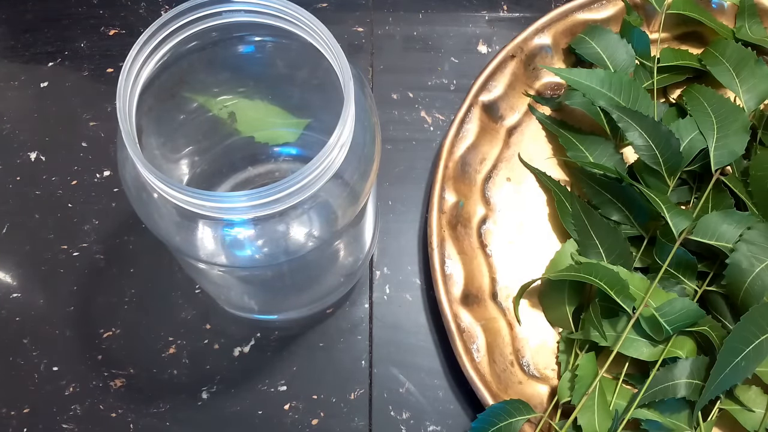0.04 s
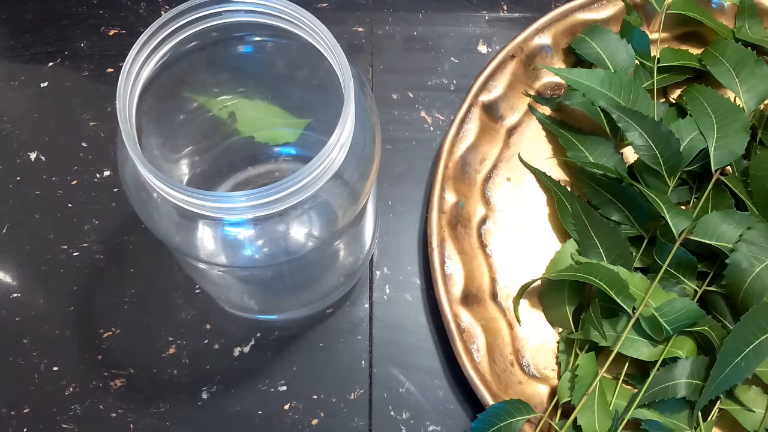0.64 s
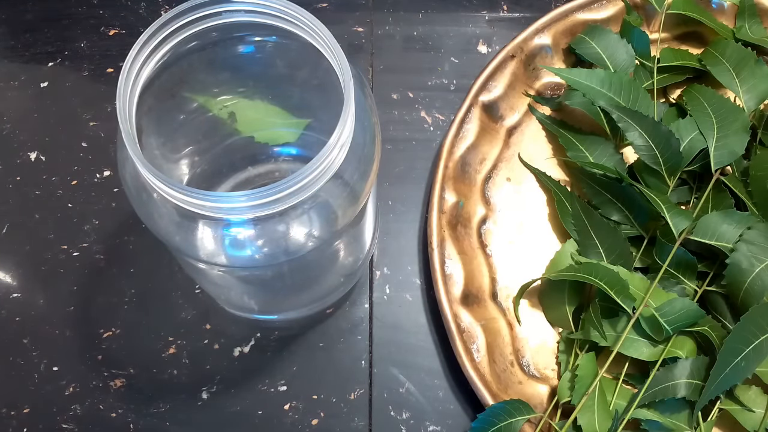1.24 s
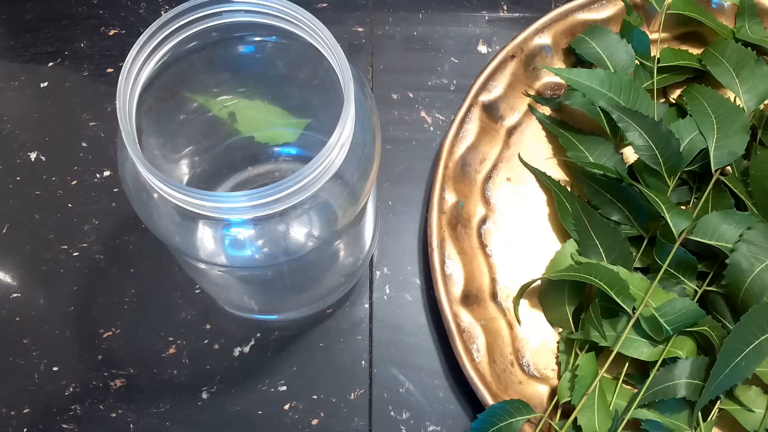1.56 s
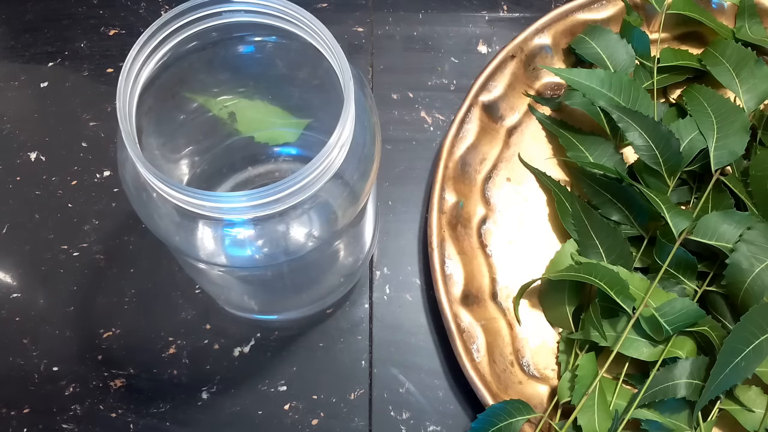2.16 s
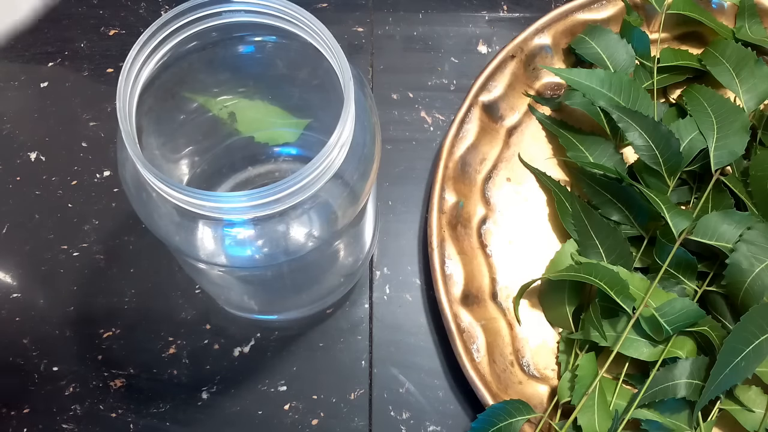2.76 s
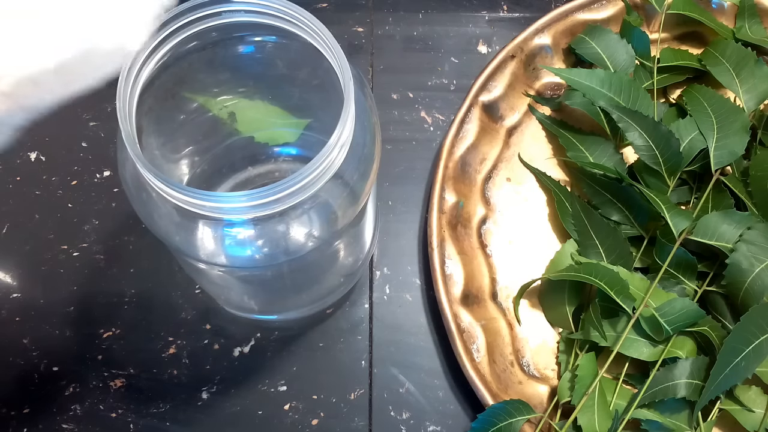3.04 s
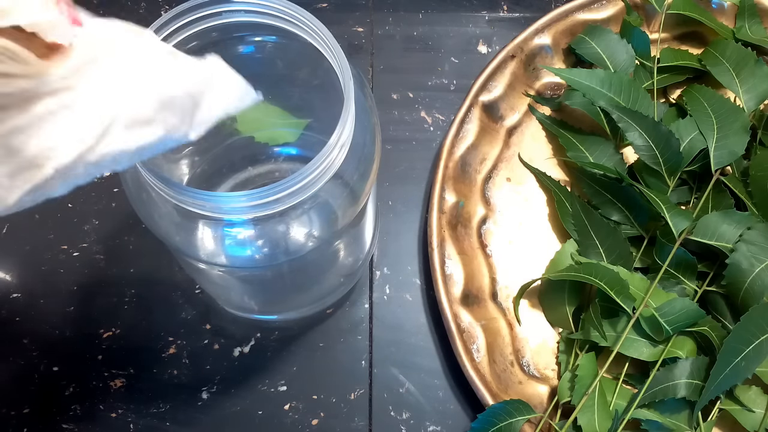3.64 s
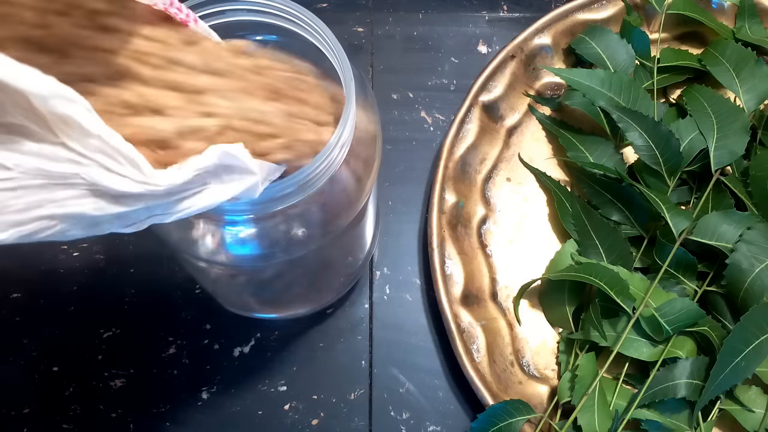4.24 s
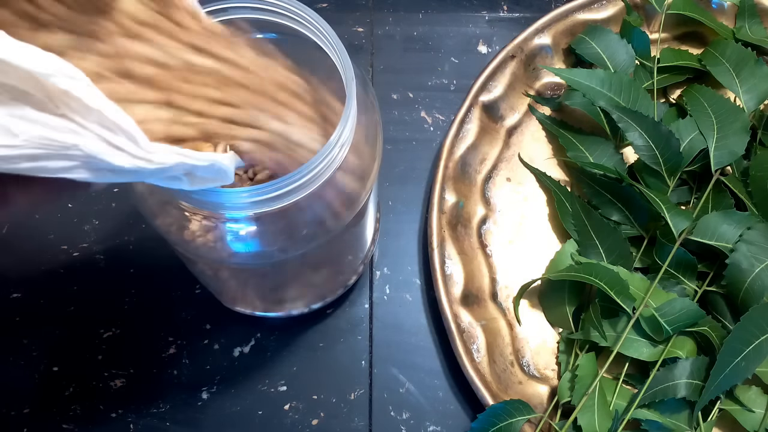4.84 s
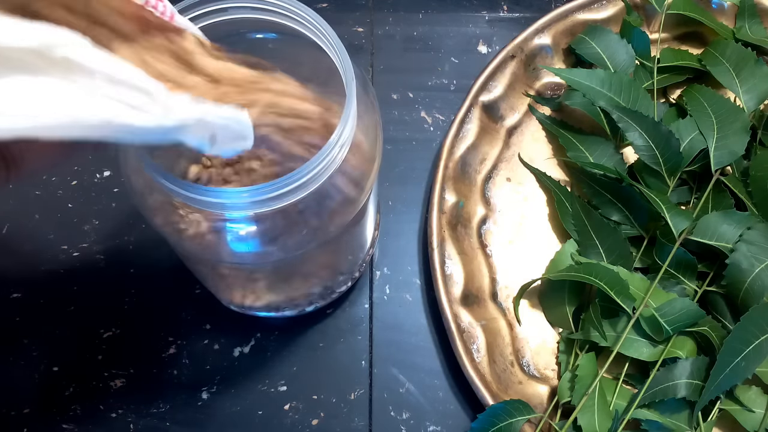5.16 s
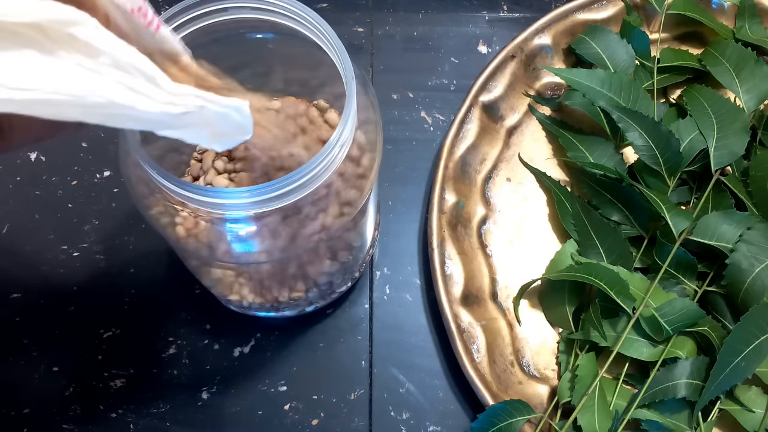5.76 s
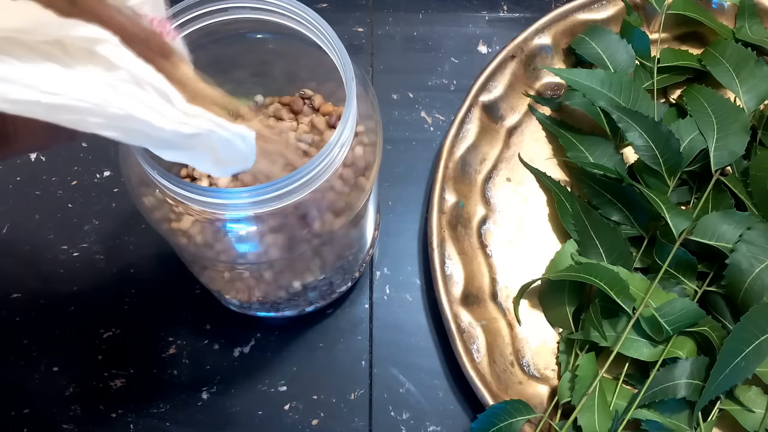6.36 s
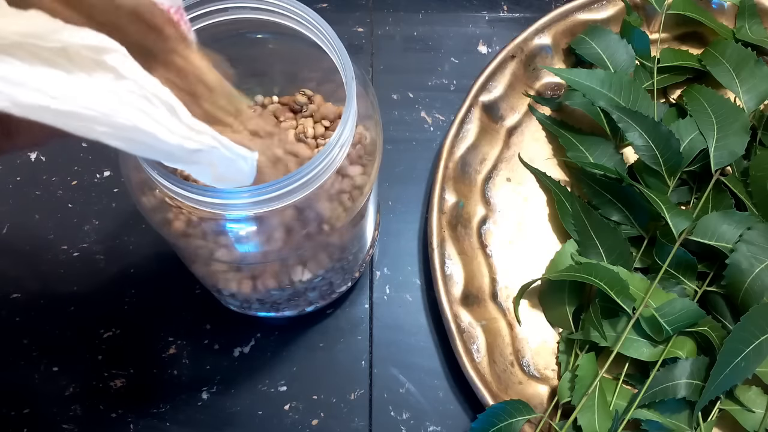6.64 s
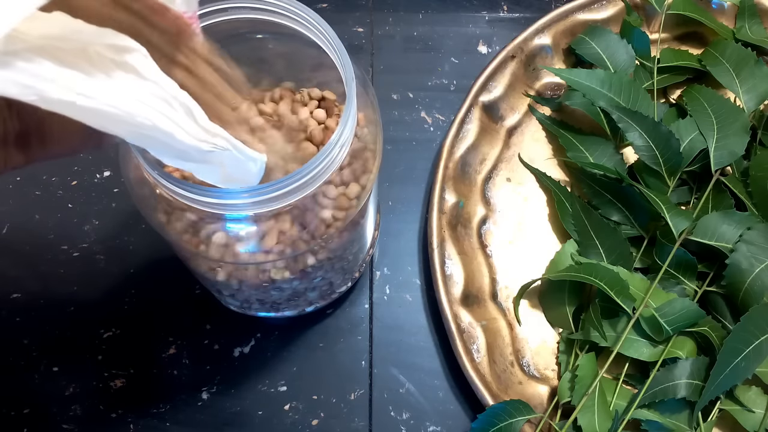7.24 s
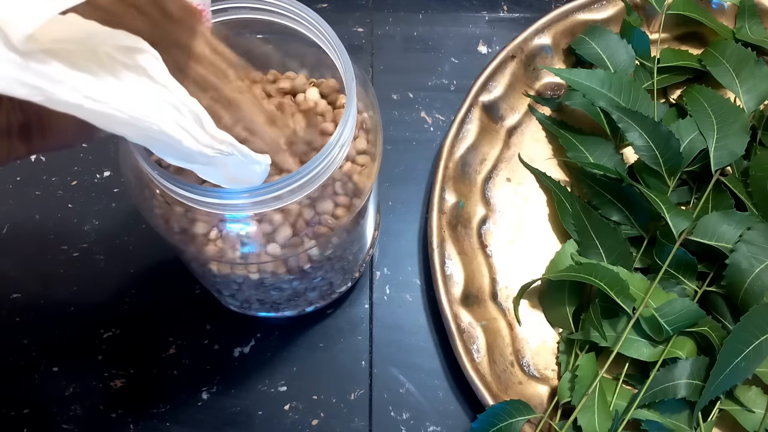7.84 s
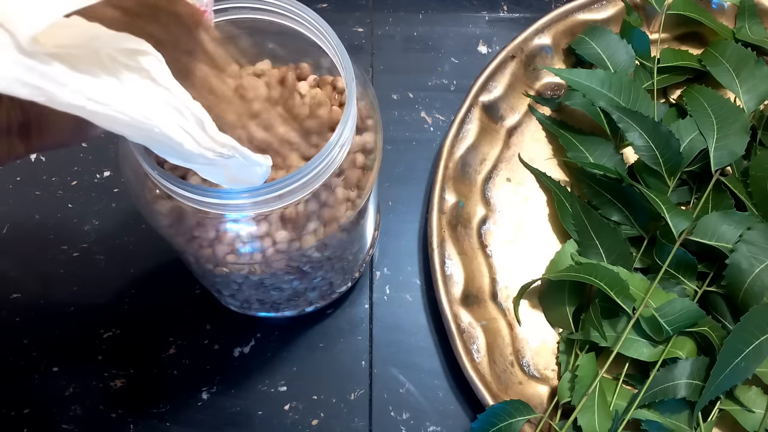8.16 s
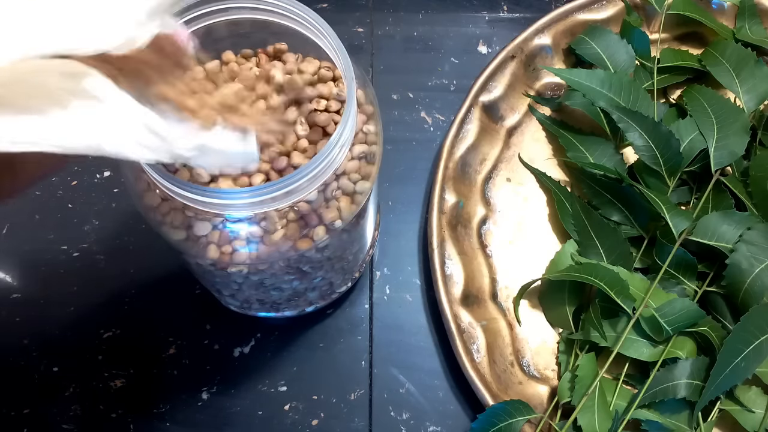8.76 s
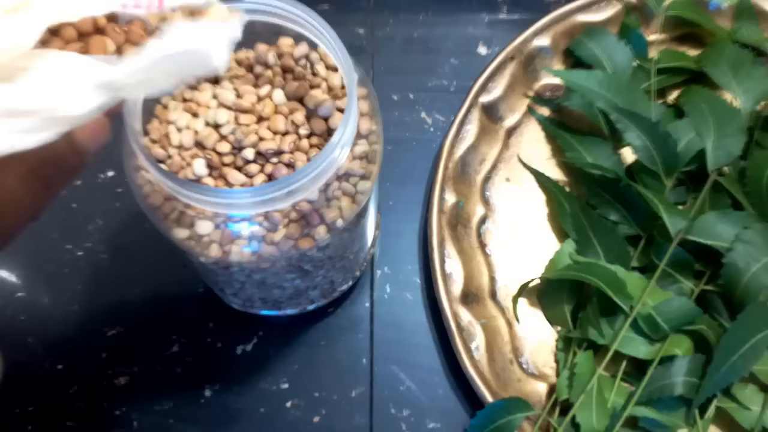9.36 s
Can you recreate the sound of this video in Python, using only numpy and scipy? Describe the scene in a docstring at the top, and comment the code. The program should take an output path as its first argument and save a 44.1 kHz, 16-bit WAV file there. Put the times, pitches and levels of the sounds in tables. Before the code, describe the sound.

Dried seeds are poured from a plastic bag into a jar near the microphone in a quiet room. Light rustling comes first, over a faint, far motor drone. A sudden gush rattles the bare jar with a brief hollow boom, then dulls to a steady patter as it fills, its hollow tone climbing. The flow dwindles to scattered single ticks.

```python
"""Dried pulses are tipped from a soft plastic bag into a jar on a table, indoors.
First the bag crinkles as it is gripped and lifted. At about 4 seconds the first seeds hit the
bare bottom, and the jar rings under a loud rush. Then the growing heap damps it to a grainy
patter, while the shrinking air space rings higher. Last, a few stragglers drop.
A far motor drones all the way through."""
import sys
import numpy as np
from scipy import signal
from scipy.fft import rfft, irfft
from scipy.io import wavfile
from scipy.ndimage import uniform_filter1d

SR = 44100
rng = np.random.default_rng(int(sys.argv[2]) if len(sys.argv) > 2 else 0)


def generate_wav(sig):
    """Save sig (samples, or channels by samples) to the path in sys.argv[1] as 16-bit PCM at SR."""
    pcm = np.round(np.clip(np.atleast_2d(sig).T, -1, 1) * 32767).astype(np.int16)
    wavfile.write(sys.argv[1], SR, pcm)


N = 423801
TIME = np.arange(N) / SR

# The flow of seeds, a gush and then a trickle. Each row: time in seconds, level in dB.
STREAM_LEVEL = [(4.11, -42), (4.15, -21), (4.21, -25), (4.28, -13.5), (4.33, -12), (4.43, -10.5),
                (4.7, -15), (5.28, -17.5), (5.47, -24.5), (5.88, -29), (6.12, -30), (6.18, -26.5),
                (6.33, -26), (6.38, -28), (7.2, -31.5), (8.4, -34), (8.95, -43), (9.36, -43), (9.55, -61)]
# How bright the stream is. Each row: time in seconds, treble lift in dB.
STREAM_TREBLE = [(4.1, -1), (4.35, 2), (4.7, -6), (5.25, -10.5), (5.6, -8), (8.7, 0.5), (9.3, -6.5)]
# The tone of seeds hitting the bottom, the walls and other seeds.
# Each row: frequency in Hz, relative level in dB.
BOTTOM_TONE = [(150, -39), (350, -5), (560, -22.5), (1000, -18.5), (1850, -8.5), (2900, -4), (3500, -2),
               (5400, 2), (7000, -2), (10000, -15), (15500, -28)]
WALL_TONE = [(150, -61), (230, -30), (345, -18), (560, -18), (720, -15), (1000, -14), (1400, -11),
             (1850, -9.5), (2900, -7), (3500, 0), (5400, 2.5), (7000, -1), (10000, -18), (15500, -33)]
HEAP_TONE = [(150, -21.5), (300, -34), (480, -18.5), (620, -32.5), (1100, -20.5), (1500, -12.5),
             (2500, -8.5), (3000, -9), (3600, -4.5), (4800, -1.5), (6500, 0), (8000, -9.5), (10500, -19.5),
             (15500, -31.5)]
# The notes of the bare bottom and the hollower walls. Each row: pitch in Hz, width in Hz, lift in dB.
BOTTOM_NOTES = [(852, 31, 16.5), (945, 32, 8.5), (1234, 120, 13.5), (1355, 50, 13.5), (1457, 50, 11),
                (1715, 110, 12), (2330, 72, 1.5), (3400, 130, 11), (3640, 61, 6.5), (4070, 49, 12),
                (5280, 200, 1.5)]
WALL_NOTES = [(625.3, 19, 16.5), (978, 30, 11.5), (1093, 31, 8), (1225, 31, 7), (1484, 25, 11),
              (2250, 160, 4.5), (2530, 200, 7.5), (3520, 49, 6.5), (4620, 75, 2)]
# A steady hollow colouring from reflections off the table and room, however full the jar is.
# Each row: pitch in Hz, width in Hz, lift in dB.
REFLECTION_PEAKS = [(687, 58, 7), (796, 82, 8), (964, 36, 9), (1082, 25, 7), (1217, 120, 8)]


def pour():
    """The stream rings the bare bottom at first, then the walls, and lands more and more on the heap."""
    gush_db, gush_hits_per_s = -12.5, 5000
    below_gush_db = np.clip(gush_db - follow(STREAM_LEVEL), 0, 38)
    # A weaker flow has fewer and more uneven hits.
    hits_per_s = gush_hits_per_s * amp(-.4 * below_gush_db)
    hits = grains(hits_per_s, spread_db=3 + .11 * below_gush_db, echo=1.3, ping=1.2)
    bottom = evened(colour(hits, BOTTOM_TONE, BOTTOM_NOTES))
    wall = evened(colour(hits, WALL_TONE, WALL_NOTES))
    heap = evened(colour(hits, HEAP_TONE, REFLECTION_PEAKS))
    undamped = np.exp(-(depth() / 0.046) ** 2)  # a thin layer is enough to damp the bottom
    jar = undamped * bottom + (1 - undamped) * wall
    bare = bare_share()
    rattle = brighten(bare * jar + (1 - bare) * heap, follow(STREAM_TREBLE))
    return amp(-0.77) * flow() * steadied(jar_air(landing_spot(rattle)), size=1200)


# Single seeds that strike hard. Each row: start in seconds, relative strength in dB.
HARD_HITS = [(4.0628, -24.5), (4.0944, -10.5), (4.1364, -9.5), (4.155, -11.5), (4.171, -8), (4.18, -11),
             (4.208, -6), (4.2206, -4), (4.227, -10), (4.245, -8.5), (4.268, -5), (4.294, -5),
             (4.313, -4.5), (5.4993, -19), (5.638, -14.5), (5.7354, -15), (5.8095, -18), (6.0025, -15),
             (6.056, -16), (6.0816, -17.5), (6.1429, -13.5), (6.1793, -18), (6.2016, -15), (6.267, -15),
             (6.3, -11.5), (6.31, -21), (6.3226, -14), (6.3865, -18.5), (6.4238, -14.5), (6.4707, -13),
             (6.5071, -12), (6.635, -12), (6.692, -16), (6.7486, -12), (6.9273, -14), (6.9588, -16),
             (7.0062, -17.5), (7.1305, -21), (7.38, -20.5), (7.601, -20), (7.6673, -15), (7.7516, -24),
             (7.8051, -18), (7.8417, -18), (7.862, -21), (7.918, -21), (8.0375, -18.5), (8.173, -22),
             (8.19, -19.5), (8.277, -17.5), (8.413, -24), (8.483, -22), (8.614, -17), (8.651, -19.5),
             (8.721, -21.5), (8.75, -21), (8.8167, -23), (8.872, -35), (8.9602, -27), (9.048, -24),
             (9.07, -19), (9.203, -26), (9.22, -25), (9.2867, -20), (9.318, -28), (9.3303, -24),
             (9.374, -23.5), (9.4124, -32.5), (9.468, -32.5)]
# The tone of one hard hit on the heap. Each row: frequency in Hz, relative level in dB.
HARD_HIT_TONE = [(200, -37.5), (1000, -12), (3200, 0), (4800, 9.5), (6500, 2.5), (8000, -4), (10500, -18.5),
                 (15500, -49)]


def single_seeds():
    """Seeds strike and bounce once; early ones ring the bare jar, and a fuller jar echoes less."""
    bounce_s, bounce_db = .011, -10.5
    empty_ring_s, full_ring_s = 0.091, 0.042
    clicks = np.zeros(N)
    filled, pitch = depth(), follow(SPOT_RING, column=2)
    for start, db in HARD_HITS:
        at = round(start * SR)
        echo = 3.2 - 2.2 * filled[at]
        ring_s = empty_ring_s + (full_ring_s - empty_ring_s) * filled[at]
        for delay, drop_db in ((0, 0), (bounce_s * rng.uniform(.6, 1.5), bounce_db)):
            hz = pitch[at] * (1 + PITCH_SCATTER * rng.standard_normal())
            click = tick(hz, width_hz=4800, contact_s=0.00026, echo=echo, ping=0.94, echo_s=ring_s)
            add(clicks, start + delay, amp(db + drop_db) * click)
    early = np.exp(-(filled / COVER_DEPTH) ** 2)
    bottom = colour(early * clicks, BOTTOM_TONE, BOTTOM_NOTES)
    heap = colour((1 - early) * clicks, HARD_HIT_TONE)
    return jar_air(landing_spot(amp(14.5) * bottom + amp(10.5) * heap))


def flow():
    """The stream's strength: it catches on the bag before each hard hit, which shakes the heap loose."""
    lull_db, lull_s = -2.5, 0.02
    spill_db, rise_s, settle_s = -9, 0.0047, 0.032
    t = np.arange(SR // 4) / SR
    settling = (1 - np.exp(-t / rise_s)) * np.exp(-t / settle_s)
    lull, spill_power = np.zeros(N), np.zeros(N)
    for start, db in HARD_HITS:
        add(lull, start - len(t) / SR, np.exp(-(t[::-1] / lull_s) ** 2))
        add(spill_power, start - rise_s, (amp(db + spill_db) * settling) ** 2)
    stream = level(STREAM_LEVEL)
    spill_power *= np.minimum(stream / amp(-37), 1) ** 2  # a weak trickle shakes little loose
    catching = stream * amp(lull_db * np.minimum(lull, 1))
    return np.sqrt(catching ** 2 + (1 - bare_share()) * spill_power)


# Seeds sliding, air booming in the neck, and the hollow ring of seeds landing just under the neck.
# Each row: time in seconds, relative level in dB.
SLIDE_LEVEL = [(4.1, -33), (4.3, -32), (5.2, -35), (5.5, -37), (6.4, -32), (8.3, -33), (8.8, -38.5),
               (9.1, -44.5), (9.6, -76)]
BOOM_LEVEL = [(4.1, -55), (4.28, -38), (4.39, -27), (4.56, -43), (5.1, -45)]
NECK_RING_LEVEL = [(8.2, -75), (8.8, -55), (9.38, -69)]


def slide_and_boom():
    """Sliding seeds add a dull rush, coloured by nearby reflections; the jar's neck booms and rings."""
    slips = grains(per_s=2500, spread_db=2.1, echo=1.0, ping=1.2)
    rush_tone = [(120, -4.5), (170, -4.5), (480, 0.5), (620, -8.0), (1050, -6.0), (1450, -8.5),
                 (2200, -1.5), (7000, -8.5), (15500, -51.0)]
    rush = colour(slips, rush_tone, REFLECTION_PEAKS)
    slide = amp(-7.5) * level(SLIDE_LEVEL) * evened(jar_air(rush))
    boom = resonate(rng.standard_normal(N), hz=360.5, width_hz=21)
    boom = resonate(boom, hz=378, width_hz=70)
    ring = resonate(rush, hz=1040, width_hz=340)
    ring = resonate(ring, hz=1040, width_hz=340)
    return slide + level(BOOM_LEVEL) * steadied(boom) + level(NECK_RING_LEVEL) * evened(ring)


# The growing heap. Each row: time in seconds, share of the jar filled from 0 to 1.
HEAP_DEPTH = [(4.2, 0.03), (4.75, 0.06), (5.45, 0.41), (6.5, 0.55), (8.2, .68), (8.9, 0.78)]
COVER_DEPTH = 0.37  # a heap this deep covers the bottom


def depth():
    """How much of the jar the heap fills."""
    return np.clip(follow(HEAP_DEPTH), 0, .95)


def bare_share():
    """The share of hits that reach the bare jar; it falls as the heap covers the bottom."""
    share_when_full = 0.059
    uncovered = np.exp(-(depth() / COVER_DEPTH) ** 3)
    return np.clip(share_when_full + (1 - share_when_full) * uncovered, 0, 1)


# The ring where the seeds land. Each row: time in seconds, relative strength in dB, pitch in Hz.
SPOT_RING = [(4.3, -8, 5280), (5.3, -9, 4620), (6.2, 1, 4600), (7.1, 0, 4540), (8, -4, 4700),
             (8.9, -19, 5260)]
PITCH_SCATTER = 0.049  # share by which one seed's click typically strays from that pitch


def landing_spot(x):
    """Adds the bright ring of the spot where the seeds land; its pitch wanders with the spot."""
    hz = follow(SPOT_RING, column=2) * (1 + .5 * PITCH_SCATTER * drift(hz=15.3))
    return x + amp(follow(SPOT_RING)) * resonate(x, hz, width_hz=310)


# The notes of the air above the heap.
# Each row: pitch in Hz when empty, how steeply it rises, width in Hz, relative strength in dB.
AIR_NOTES = [(395, 0.3, 110, -3.5), (905, 0.674, 320, -2), (2250, 0.2, 320, -4)]


def jar_air(x):
    """Adds the ring of the air in the jar, which climbs as the heap leaves it less room."""
    air = 1 - depth()
    return x + sum(amp(db) * resonate(x, hz / air ** rise, width) for hz, rise, width, db in AIR_NOTES)


# The tone of the plastic. Each row: frequency in Hz, relative level in dB.
BAG_TONE = [(150, -21.5), (240, -2.5), (340, -17), (520, -7.5), (720, -10.5), (920, -8.5), (1350, -13),
            (1800, -13.5), (4500, -14.5), (6500, -11.5), (8000, -20), (10500, -32.5), (15500, -55.5)]
# Soft knocks while the bag is gripped. Each row: start in seconds, level in dB, pitch in Hz.
BAG_KNOCKS = [(1.143, -30, 510), (1.372, -34.5, 550), (1.926, -28.5, 904), (2.022, -39.5, 920)]


def bag():
    """Thin plastic crinkles, brighter when gripped hard, with a few soft knocks."""
    crinkle = grains(per_s=2500, spread_db=1.7, echo=2.2, ping=5.5)
    crinkle = colour(crinkle, BAG_TONE, peaks=[(1770, 220, 4.6), (2760, 160, 3.9)])
    effort = handling()
    treble_db = np.clip(0.41 * (20 * np.log10(effort) + 48), -5, 3)
    out = amp(0.88) * effort * steadied(brighten(crinkle, treble_db))
    t = np.arange(SR // 6) / SR
    soften = signal.butter(4, 6000, fs=SR)
    for start, db, hz in BAG_KNOCKS:
        thud = np.sin(2 * np.pi * hz * t) * amp(-60 * t / 0.071)
        crack = rng.standard_normal(len(t)) * np.exp(-t / 0.0037)
        add(out, start, amp(db) * signal.lfilter(*soften, 0.62 * thud + 0.66 * crack))
    return out


# The hand grips the bag. Each row: start in seconds, length in seconds, relative level in dB.
HAND_GRIPS = [(0, 0.01, -49.5), (0.028, 0.081, -53.5), (0.323, 0.15, -59.5), (0.45, 0.1, -44.5),
              (0.569, 0.17, -46), (1.047, .1, -51), (1.18, 0.22, -48.5), (1.55, 0.18, -48),
              (1.799, 0.15, -45), (2.069, 0.1, -49.5), (2.207, 0.15, -45.5), (2.357, 0.16, -50.5)]


def handling():
    """How hard the bag rustles: separate grips, and a slow swell as it is lifted and tilted."""
    grip_power = sum((amp(db) * stroke(start, length)) ** 2 for start, length, db in HAND_GRIPS)
    start_s, end_s, rise_db_per_s = 1.1, 4.05, 2
    lift = amp(-56 + rise_db_per_s * (TIME - start_s)) * stroke(start_s, end_s - start_s)
    return np.sqrt(grip_power + lift ** 2 + 1e-14)


# The tone of the room's air. Each row: frequency in Hz, relative level in dB.
ROOM_TONE = [(25, -15.5), (85, -5.5), (130, -10), (240, -16), (450, -28.5), (930, -23.5), (2300, -35),
             (5900, -35.5), (9800, -62), (15000, -99.5)]
# The room's peaks and one dip. Each row: pitch in Hz, width in Hz, lift in dB.
ROOM_NOTES = [(155.5, 14, 8), (235, 14, 7), (513, 56, 9), (1200, 110, -1.5)]


def room_air():
    """A faint, low hush, shaped by the room."""
    return amp(-55.5) * evened(colour(rng.standard_normal(N), ROOM_TONE, ROOM_NOTES))


# The motor's two hums. Each row: time in seconds, level of the lower in dB, level of the higher in dB.
MOTOR_HUMS = [(0, -44, -51.5), (2.2, -50, -46.5), (3.1, -49.5, -52), (4, -49, -41.5), (6.1, -55.5, -50),
              (6.9, -50, -46), (7.8, -64, -44), (8.3, -74, -53.5), (9.5, -72, -46)]
# The rumble around the motor. Each row: frequency in Hz, relative level in dB.
RUMBLE_TONE = [(30, -30), (90, 8), (125, -13.5), (160, 8), (200, -20), (260, -2.5), (400, -14), (1000, -48)]


def far_motor():
    """A motor hums at two and three times its wavering turning speed, over a low rumble."""
    turns_per_s = 29.1 * (1 + 0.0262 * drift(hz=1.92))
    turns = np.cumsum(turns_per_s) / SR
    hum = np.zeros(N)
    for multiple in (2, 3):
        gain = amp(follow(MOTOR_HUMS, column=multiple - 1) + 2.9 * drift(hz=3.1))
        hum += gain * np.sin(2 * np.pi * multiple * turns + .5 * drift(hz=11.2))
    return hum + amp(-55.5) * evened(colour(rng.standard_normal(N), RUMBLE_TONE))


def tick(hz, width_hz, contact_s, echo, ping, echo_s, room=0.15, room_s=0.75):
    """One click with close echoes and a faint room tail; ping sets how much they ring at its pitch."""
    t = np.arange(SR // 5) / SR
    scrape, inside, walls = rng.standard_normal((3, len(t)))
    contact = t / contact_s * np.exp(-t / contact_s)
    pitched = evened(contact * np.sin(2 * np.pi * hz * t))
    direct = pitched + 1.6 * evened(contact * scrape)  # dry skins scrape as they hit
    echoes = evened(inside * amp(-60 * t / echo_s) * (t > .001))
    tail = evened(walls * amp(-60 * t / room_s) * (t > .005))
    reflected = echo * echoes + room * tail
    sound = direct + reflected + ping * resonate(reflected, hz, width_hz)
    return sound / np.linalg.norm(sound)


def grains(per_s, spread_db, echo, ping, count=40):
    """Random clicks of many pitches and sizes."""
    size = amp(spread_db * np.minimum(rng.exponential(1, N), 3.2))
    size *= rng.random(N) < per_s / SR
    size *= rng.choice([-1, 1], N)
    kind = rng.integers(0, count, N)
    pitches = np.linspace(300, 15000, count) * rng.uniform(.97, 1.03, count)
    ticks = [tick(hz, width_hz=760, contact_s=0.00029, echo=echo, ping=ping, echo_s=0.098)
             for hz in pitches]
    return sum(signal.oaconvolve(size * (kind == k), click)[:N] for k, click in enumerate(ticks))


def colour(x, tone, peaks=()):
    """Shapes a sound with a smooth tone curve, lifted at each peak."""
    hz = np.fft.rfftfreq(8192, 1 / SR)
    tone_hz, db = np.transpose(tone)
    gain = amp(np.interp(np.log(hz + 1), np.log(tone_hz + 1), db))
    for centre, width, lift_db in peaks:
        gain = gain * amp(lift_db / (1 + (2 * (hz - centre) / width) ** 2))
    # Build a filter that rings only after each hit, never before it.
    log_gain = irfft(np.log(np.maximum(gain, 1e-5)))
    half = len(hz) - 1
    one_sided = 2 * log_gain[:half] * (np.arange(half) > 0)
    taps = irfft(np.exp(rfft(one_sided, 2 * half)))[:half]
    return signal.oaconvolve(x, taps / np.linalg.norm(taps))[:N]


def resonate(x, hz, width_hz):
    """Rings at a steady or moving pitch; a narrower width rings longer."""
    turn = np.exp(2j * np.pi * np.cumsum(hz * np.ones(len(x))) / SR)
    decay = np.exp(-np.pi * width_hz / SR)
    return 2 * (turn * signal.lfilter([1 - decay], [1, -decay], x / turn + 1e-18)).real


def brighten(x, lift_db):
    """Lifts or lowers the treble: hard, short contacts are brighter than cushioned ones."""
    treble = signal.sosfiltfilt(signal.butter(2, 7000, "high", fs=SR, output="sos"), x)
    return x + (amp(lift_db) - 1) * treble


def steadied(x, size=3000):
    """Takes out slow chance swells, leaving the grain."""
    power = uniform_filter1d(uniform_filter1d(x ** 2, size), size)
    return x / np.sqrt(abs(power) + 1e-3 * power.mean())


def stroke(start, length, attack_s=0.041, release_s=0.039):
    """A level that rises, holds and dies away."""
    t = TIME - start
    return np.clip(t / attack_s, 0, 1) * np.exp(-np.clip((t - length) / release_s, 0, 20))


def drift(hz):
    """A slow random wander."""
    return evened(signal.sosfilt(signal.butter(2, hz, fs=SR, output="sos"), rng.standard_normal(N)))


def follow(rows, column=1):
    """Joins the dots of one column over time."""
    rows = np.asarray(rows)
    return np.interp(TIME, rows[:, 0], rows[:, column])


def level(rows):
    """Gain from a dB curve, fading to silence beyond its ends."""
    outside = np.maximum(rows[0][0] - TIME, 0) + np.maximum(TIME - rows[-1][0], 0)
    return amp(follow(rows)) * np.exp(-outside / 0.045)


def add(mix, start_s, sound):
    """Mixes a sound in at its start time."""
    part = mix[max(round(start_s * SR), 0):][:len(sound)]
    part += sound[:len(part)]


def amp(db):
    """Turns decibels into gain."""
    return 10 ** (np.asarray(db) / 20)


def evened(x):
    """Scales to an average power of 1."""
    return x / np.sqrt(np.mean(x ** 2) + 1e-20)


def scene():
    """All sources at one microphone."""
    return (bag() + pour() + slide_and_boom() + single_seeds() + room_air() + far_motor())[None]


def record(dry):
    """Rounds off the loudest peaks, then cuts the highest treble."""
    rounded = dry / (1 + (abs(dry) / .95) ** 6) ** (1 / 6)
    treble_cut = signal.firwin(511, 15700, window=("kaiser", 9), fs=SR)
    return signal.oaconvolve(rounded, treble_cut[None], "same")


dry = scene()
out = record(dry)
generate_wav(out)
```